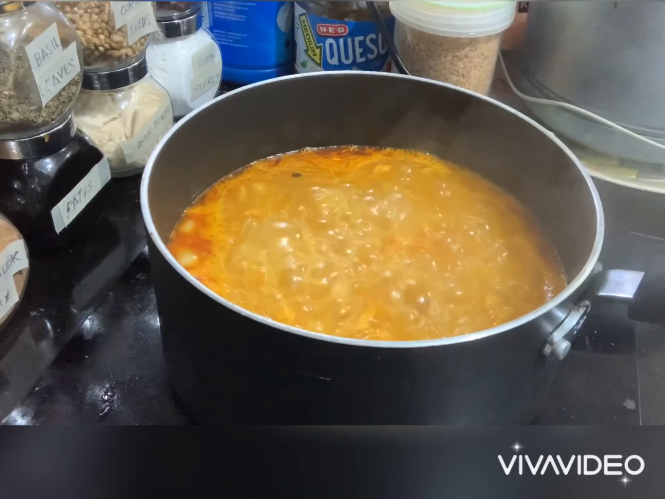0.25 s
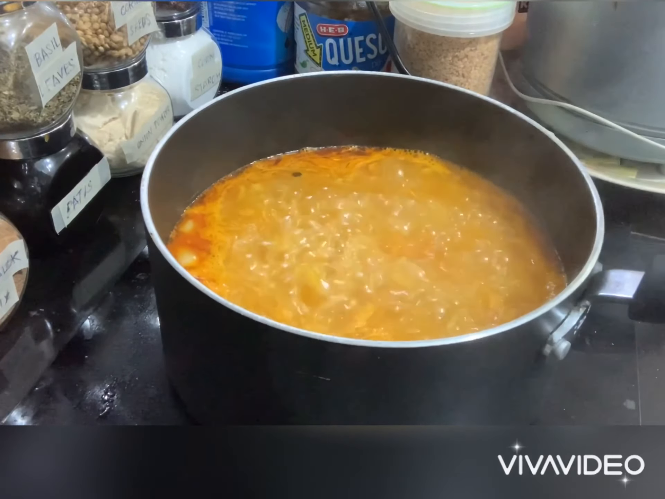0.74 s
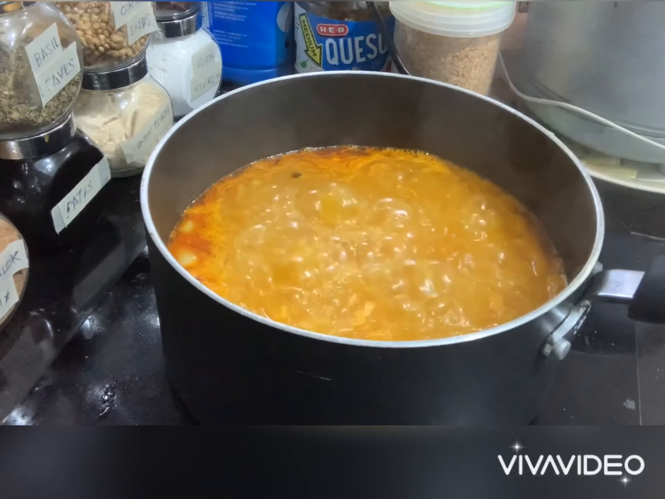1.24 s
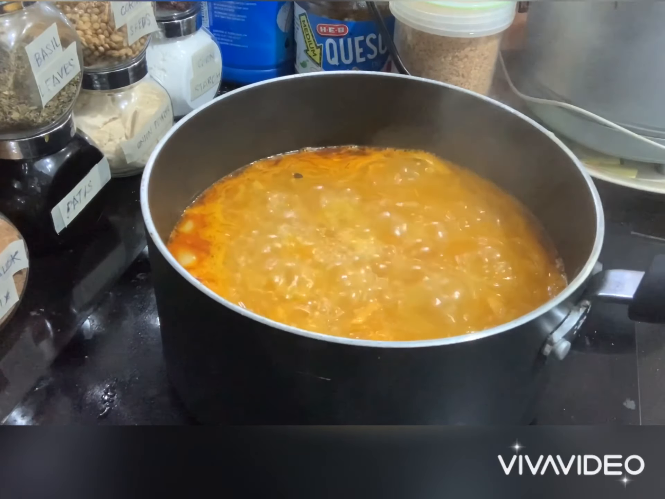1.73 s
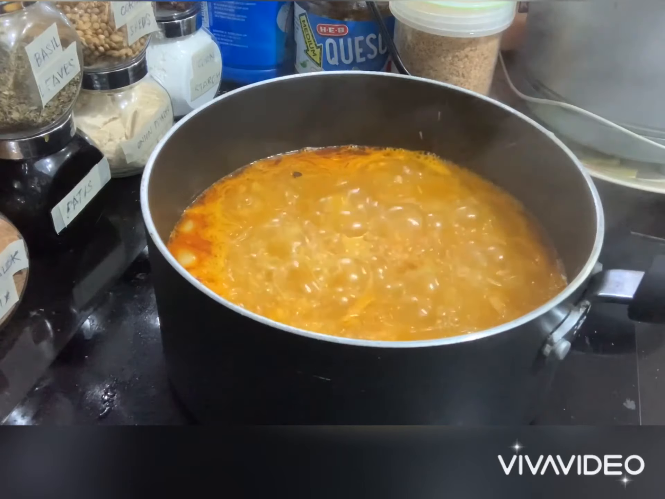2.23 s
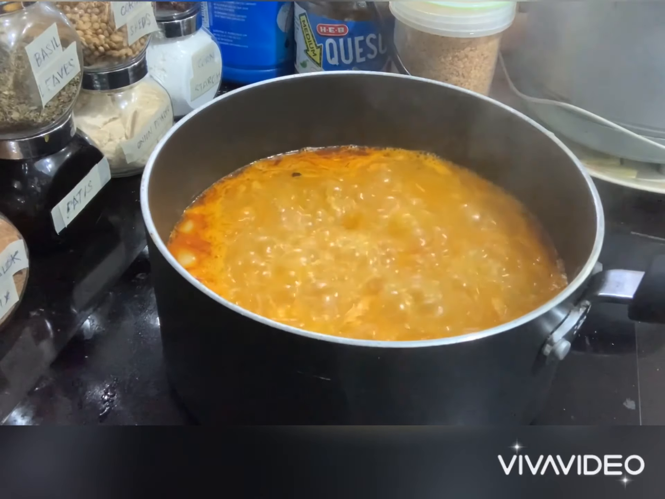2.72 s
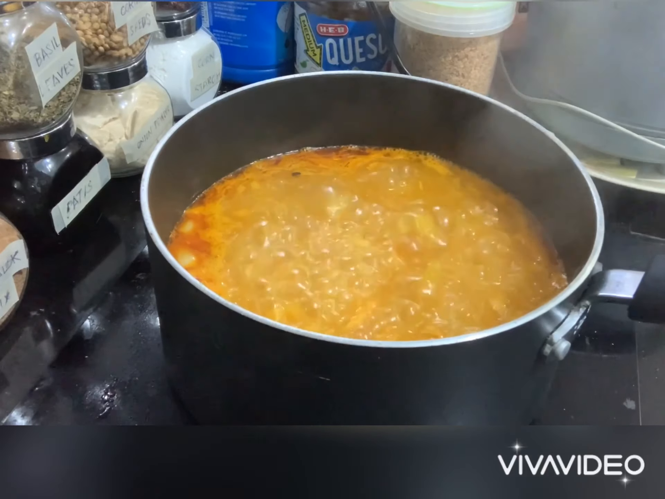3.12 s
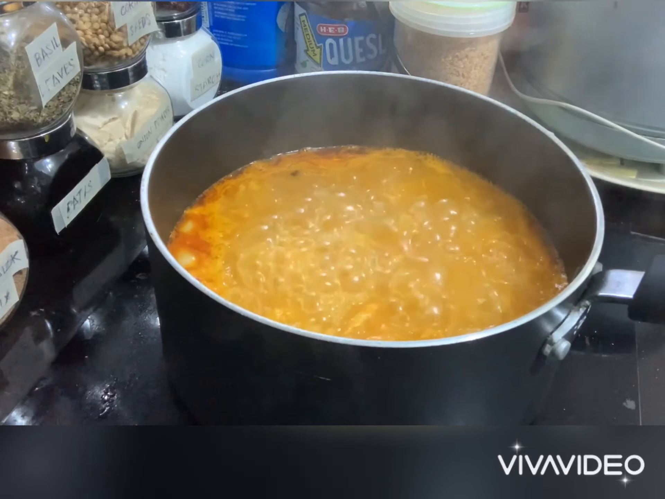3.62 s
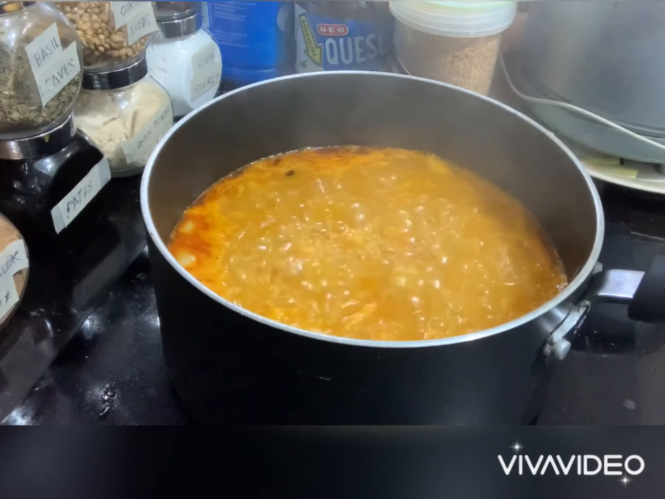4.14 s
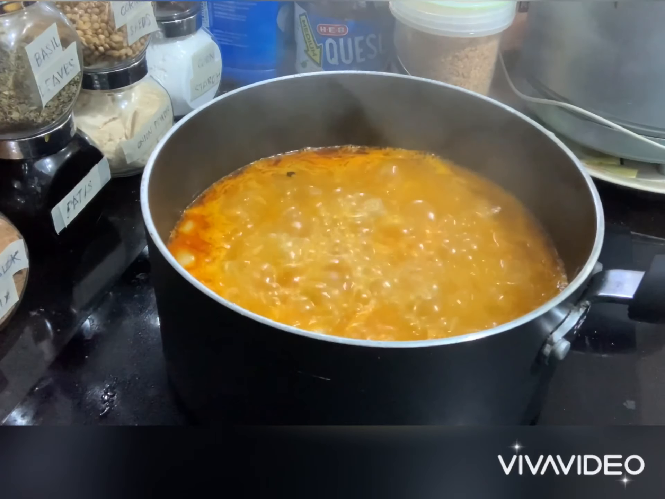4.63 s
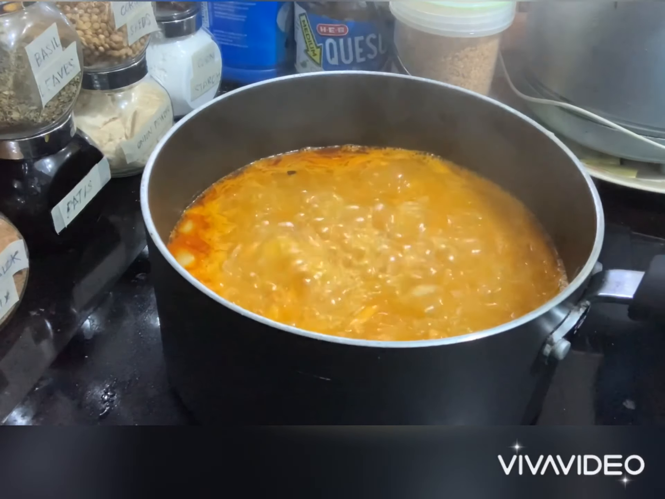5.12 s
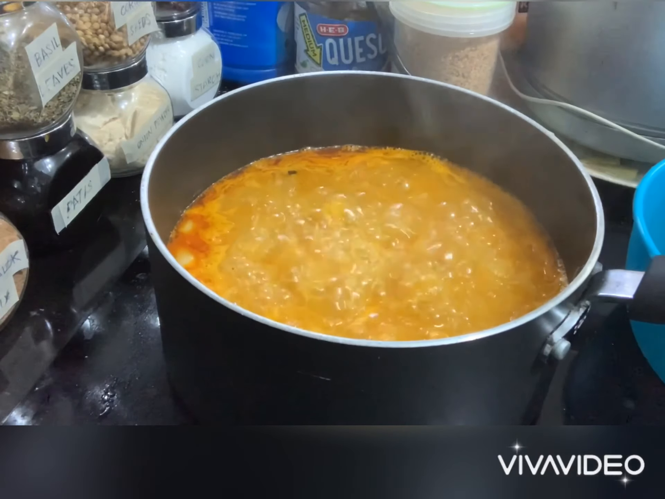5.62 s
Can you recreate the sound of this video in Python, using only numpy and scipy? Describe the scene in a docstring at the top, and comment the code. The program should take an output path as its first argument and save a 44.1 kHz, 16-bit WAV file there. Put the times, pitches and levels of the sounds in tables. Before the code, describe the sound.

A pot of soup at a rolling boil in a small home kitchen, heard in stereo from just above the pan, slightly left. Wet bubbles pop many times a second, each rising slightly in pitch, with occasional bright film snaps. A bright crackling sizzle comes early and dies away. Low steam gulps cluster before two seconds; a strong one spatters after 3.7. Bubbling then continues evenly over soft bassy room noise and hum.

```python
"""A small kitchen: thick soup at a rolling boil in an open saucepan, heard from just above the rim.
Bubbles burst in little clusters and thin films snap; each bubble is a short ringing note that rises in pitch.
Big pockets of steam gulp with low swelling notes and spatter, while small bubbles simmer and the depths rumble.
Random ticks make the fizz and the sizzle at the edge; filtered noise and steady tones make the room and cooker."""
import sys
import numpy as np
from scipy import signal
from scipy.fft import rfft, irfft, next_fast_len
from scipy.io import wavfile

SR = 44100
rng = np.random.default_rng(int(sys.argv[2]) if len(sys.argv) > 2 else 0)


def int16_out(signal):
    """Quantize to a 16-bit WAV file."""
    q = np.round(np.clip(np.atleast_2d(signal).T, -1, 1) * 32767)
    wavfile.write(sys.argv[1], SR, q.astype(np.int16))


N = 258602
TIME = np.arange(N) / SR  # seconds


# the largest bursting bubbles, before POP_DB and the pan and kitchen:
# [start_s, level_db, pitch_hz, foam_db (the small bubbles around it, compared with the burst)]
BURSTING_BUBBLES = [(0.037, -30.5, 1670, -28), (0.104, -29.5, 1380, -6), (0.175, -32.5, 900, -8),
                    (0.212, -27.5, 1230, -10), (0.237, -27.5, 1360, -1), (0.300, -30, 1510, -1),
                    (0.337, -24.5, 1080, -11), (0.429, -35, 1170, 0), (0.480, -15.5, 1310, -18),
                    (0.536, -29, 1580, -11), (0.564, -31.5, 1000, -10), (0.656, -32.5, 850, -6),
                    (0.767, -31, 980, 0), (0.788, -33, 1130, 5.5), (0.844, -23.5, 1170, -4),
                    (0.864, -18.5, 1360, -28), (0.899, -31, 880, -17), (0.932, -29, 1870, -22),
                    (1.037, -33.5, 810, 4.5), (1.046, -23.5, 1460, -19), (1.134, -20.5, 1450, -10),
                    (1.215, -34, 1090, -15), (1.314, -27, 1250, -4), (1.328, -36, 940, 6),
                    (1.345, -28, 1570, 0), (1.435, -23, 990, -7), (1.447, -31, 1410, -11),
                    (1.518, -28.5, 930, 0), (1.629, -22.5, 2000, -6), (1.678, -28, 1390, -7),
                    (1.713, -30, 1080, 4.5), (1.731, -40, 1200, -15), (1.780, -34, 710, -4),
                    (1.834, -31, 920, -2), (1.995, -24.5, 1120, -5.5), (2.040, -28, 1240, -18),
                    (2.095, -31, 1600, -10), (2.124, -34, 840, -4), (2.249, -31, 840, 4.5),
                    (2.312, -27, 1560, -1), (2.324, -26, 860, -5), (2.430, -34, 1000, 8.5),
                    (2.441, -24, 1470, 0.5), (2.451, -43, 875, -12), (2.531, -35.5, 880, 4),
                    (2.547, -22.5, 1700, -18), (2.593, -19.5, 1600, -14), (2.714, -27, 1180, -3),
                    (2.739, -23, 1270, -11), (2.7575, -17.5, 1530, -8.5), (2.915, -28.5, 1290, 1),
                    (2.936, -26, 1180, -3), (3.003, -32.5, 830, -27), (3.122, -22.5, 1230, -13),
                    (3.125, -24.5, 814, -14), (3.206, -27.5, 1230, -2.5), (3.238, -40, 840, -19),
                    (3.364, -31.5, 1050, -6), (3.456, -21, 1470, -24), (3.508, -25.5, 1210, -4),
                    (3.520, -16.5, 1150, -12.5), (3.568, -26.5, 1660, -16), (3.614, -31, 1500, 0),
                    (3.662, -31.5, 1490, -6), (3.711, -31, 664, -26), (3.713, -23.5, 1650, -1.5),
                    (3.819, -31, 870, -12), (3.844, -26, 1470, -9), (3.876, -32, 1010, -13),
                    (3.963, -30.5, 850, -12), (4.043, -34, 1250, -14), (4.117, -26.5, 1770, -6),
                    (4.205, -33, 1230, -5), (4.280, -25, 1300, -5), (4.348, -35, 1340, -5),
                    (4.510, -19.5, 1200, -7.5), (4.531, -25, 1100, -23), (4.593, -32, 870, -9),
                    (4.652, -35, 1290, 9), (4.765, -25, 1350, -23), (4.810, -28, 1400, -1),
                    (4.883, -24, 1330, -12), (4.932, -28.5, 1540, -5), (4.973, -29, 920, -6.5),
                    (5.15, -25, 1280, 0.5), (5.177, -29, 1590, 0), (5.229, -35, 1440, -3),
                    (5.299, -31, 1510, -9), (5.332, -28.5, 920, -6), (5.357, -30, 1140, -7),
                    (5.436, -32.5, 1110, 2), (5.532, -25.5, 1240, -2), (5.665, -32, 1120, -10),
                    (5.7, -26, 1090, -8), (5.848, -27.5, 1310, -27)]
POP_DB = 1.8
POP_CYCLES = 1.95  # wave cycles in which a large bubble fades to about a third


def bursts(foam_s, foam_lead_s, foam_octaves, foam_cycles, rise, count):
    """Large surface bubbles burst, each among a few smaller ones that give way one after another."""
    start_s, level_db, pitch_hz, foam_db = np.transpose(BURSTING_BUBBLES)
    main = bubbles(start_s, from_db(level_db), pitch_hz, POP_CYCLES, rise, size=1400)
    draws = rng.standard_normal((len(start_s), 4, count))
    when, strength, pitch, ring = draws.transpose(1, 0, 2)
    # most of the foam follows the burst, ever weaker
    turn = (np.arange(count) + 0.5 + 0.3 * when) / count
    foam_starts = start_s[:, None] - foam_lead_s + foam_s * turn
    foam_gains = from_db((level_db + foam_db)[:, None] - 4.5 + 2 * strength - 4 * turn)
    # foam pitches scatter around a point midway between the burst and 1300 Hz
    foam_hz = np.sqrt(pitch_hz[:, None] * 1300) * 2 ** (foam_octaves * pitch)
    cycles = foam_cycles * 2 ** (0.3 * ring)
    foam = bubbles(foam_starts.ravel(), foam_gains.ravel(), foam_hz.ravel(), cycles.ravel(), rise, size=1000)
    return main + foam


def bubbles(starts, gains, pitches, cycles, rise, size):
    """Each bubble opens within a cycle, rings down over a few more and rises in pitch."""
    age = np.arange(size) / SR
    turns = pitches[:, None] * age
    life = turns / np.reshape(cycles, (-1, 1))
    phase = 2 * np.pi * turns * (1 + rise * life / (1 + life))
    opening = 1 - np.exp(-1.5 * turns ** 2)
    rings = gains[:, None] * opening * np.exp(-life) * np.sin(phase)
    at = (np.maximum(starts, 0) * SR).astype(int)[:, None] + np.arange(size)
    # add every ring into one track
    return np.bincount(at.ravel(), rings.ravel(), N)[:N]


# thin films snapping, before SNAP_DB and the pan and kitchen: [start_s, level_db, pitch_hz]
FILM_SNAPS = [(0.221, -31, 3430), (0.682, -35, 2290), (1.194, -33, 2680), (1.2421, -27.5, 2870),
              (2.0944, -28.5, 3070), (3.1715, -29, 2460), (3.616, -24.5, 2900), (3.711, -24, 3260),
              (4.118, -38, 2250), (5.001, -34, 2470), (5.219, -30.5, 3070)]
SNAP_DB = 2.5
# the tick of a tearing film: [pitch_hz, width_hz, level_db (click before filtering, compared with the snap)]
TEARING_TICK = (3000, 3000, 19)


def snaps(spray_s, octaves, spray_db, count):
    """A film tears with a bright tick and a quick spray of still smaller bubbles."""
    start_s, level_db, pitch_hz = np.transpose(FILM_SNAPS)
    shape = (len(start_s), count)
    spray_starts = start_s[:, None] + spray_s * rng.exponential(1, shape)
    spray_hz = pitch_hz[:, None] * 2 ** (octaves * rng.standard_normal(shape))
    spray_gains = np.repeat(from_db(level_db + spray_db), count)
    spray = bubbles(spray_starts.ravel(), spray_gains, spray_hz.ravel(), 2.6, 0.076, size=400)
    tick_hz, tick_width, tick_db = TEARING_TICK
    tears = np.bincount((start_s * SR).astype(int), from_db(level_db + tick_db), N)
    tick = resonate(resonate(tears, tick_hz, tick_width), tick_hz, tick_width)
    snap = bubbles(start_s, from_db(level_db), pitch_hz, 1.3, 0.03, size=400)
    return tick + snap + spray


# big steam pockets, before the pan and kitchen: [start_s, level_db, pitch_hz, swell_s, spatter_db]
STEAM_POCKETS = [(1.112, -34, 122, 0.012, -62), (1.322, -31, 157, 0.018, -48), (1.688, -35, 375, .011, -55),
                 (1.692, -27, 161, .017, -41), (1.718, -28, 270, 0.014, -54),
                 (1.757, -24.5, 262, 0.011, -45), (1.770, -31, 358, .012, -58),
                 (1.774, -30, 160, 0.017, -58), (1.825, -36, 260, 0.016, -58),
                 (3.706, -14, 254, 0.0088, -31), (3.733, -33, 280, .011, -45),
                 (3.756, -23.5, 268, 0.0125, -40), (3.795, -37, 268, .022, -60)]
# tone colour of the spatter: [pitch_hz, level_db]
SPATTER_COLOUR = [(200, -31), (400, -1.5), (700, 10.5), (1000, 2), (2100, 8), (3200, -0.5), (5500, -4.5),
                  (9000, -13), (15000, -16.5)]


def gulps(rise, spray_lead_s, spray_stretch, slosh_db, slosh_s, count):
    """A pocket of steam swells through the surface with a low note, sloshes shut and throws a spray of drops."""
    note, spray = np.zeros(N), np.zeros(N)
    age = TIME[:SR // 3]
    for start_s, level_db, pitch_hz, swell_s, spatter_db in STEAM_POCKETS:
        life = age / swell_s
        phase = 2 * np.pi * pitch_hz * age * (1 + rise * life)
        swell = life ** 1.5 * np.exp(-life ** 2 / 3)
        note[int(start_s * SR):][:len(age)] += from_db(level_db) * swell * np.sin(phase)
        # slower pockets stir up more soup
        when, pitch = rng.random((2, count))
        stirred = np.full(count, from_db(slosh_db) * swell_s / slosh_s)
        note += bubbles(start_s + 3 * swell_s * when, stirred, 200 * 3.8 ** pitch, 3.4, 0.11, size=3000)
        flight = age / (spray_stretch * swell_s)
        spray_start = int((start_s - spray_lead_s) * SR)
        spray[spray_start:][:len(age)] += from_db(spatter_db) * flight * np.exp(1 - flight)
    return note, spray * crackle(2500, 2.6, SPATTER_COLOUR)


# strength of small bubbles by pitch: [pitch_hz, level_db]
SMALL_BUBBLE_STRENGTH = [(330, -5.5), (500, -4.5), (800, -1), (1050, -3.5), (1450, 0), (1900, -2),
                         (2800, 2), (4200, -20)]
SURFACE_DB = -50.5  # middle level of the small surface bubbles, before the pan


def simmer(size_db, cycles, count):
    """The whole surface is covered in small bubbles of every pitch from 330 to 4200 Hz."""
    when, size, pitch = rng.random((count, 3)).T
    hz = 330 * (4200 / 330) ** pitch
    # many weak bubbles, a few strong
    gains = from_db(at_hz(SMALL_BUBBLE_STRENGTH, hz) - size_db * np.log(size + 0.058))
    return rms_one(bubbles(when * N / SR, gains, hz, cycles, 0.078, size=800))


# level at the start, before the pan, then a slow easing off
RUMBLE_DB, RUMBLE_EASE_DB_PER_S = -43.5, 3


def rumble(low_hz, high_hz, size_db, cycles, count):
    """Steam bubbles wobble up from the bottom of the pan with low notes."""
    when, size, pitch = rng.random((count, 3)).T
    hz = low_hz * (high_hz / low_hz) ** pitch
    gains = from_db(-size_db * np.log(size + 0.23))
    return rms_one(bubbles(when * N / SR, gains, hz, cycles, 0.09, size=4000))


# tone colour of the fizz: [pitch_hz, level_db]
FIZZ_COLOUR = [(400, -2.5), (1000, 3), (2200, 7), (3400, 6), (5000, 1), (7000, -3), (12000, -64)]
# level at the start, then a slow easing off
FIZZ_DB, FIZZ_EASE_DB_PER_S = -49, 0.5


def fizz():
    """Fine random ticks flare up and fade over a steady share."""
    level = from_db(FIZZ_DB - FIZZ_EASE_DB_PER_S * TIME)
    flares = spurts(per_s=90, fade_s=0.006, steady=3.2, wander_db=1.0)
    return level * flares * crackle(4500, 2.5, FIZZ_COLOUR)


# sizzle on the hot wall, dying down on the way, before SIZZLE_DB: [time_s, level_db]
SIZZLE_LEVEL = [(0.0, -55), (0.08, -50), (0.18, -59), (0.25, -54), (0.36, -58), (0.62, -54), (0.77, -55.5),
                (0.85, -55), (1.0, -55.5), (1.08, -51), (1.22, -56.5), (1.32, -54), (1.38, -52.5),
                (1.45, -56.5), (1.92, -54.5), (2.1, -64), (2.23, -55), (2.35, -58.5), (2.41, -53.5),
                (2.56, -57), (2.68, -67), (2.8, -61), (2.94, -66), (3.59, -70), (3.88, -62.5),
                (4.19, -68.5), (5.12, -67), (5.86, -65)]
SIZZLE_DB = 7
# tone colour of the sizzle: [pitch_hz, level_db]
HOT_WALL_COLOUR = [(1500, -14), (4000, -2), (7000, -1), (8500, 0), (10600, -.5), (11400, -3.5),
                   (12000, -1.5), (13200, -6), (14300, -4.5), (15500, -6.5)]


def sizzle():
    """Drops boil off the hot wall at the edge in a bright, flaring crackle."""
    level = from_db(SIZZLE_DB) * gain_in_time(SIZZLE_LEVEL)
    flares = spurts(per_s=55, fade_s=0.010, steady=0.8, wander_db=0.5)
    return level * flares * crackle(6000, 0.76, HOT_WALL_COLOUR)


def spurts(per_s, fade_s, steady, wander_db):
    """Drops land on hot metal: each flares at once and boils off, over a steady share; rms 1."""
    landings = (rng.random(N) < per_s / SR) * np.minimum(rng.exponential(1, N), 3)
    flare = signal.lfilter([1], [1, -np.exp(-1 / (fade_s * SR))], landings + 1e-18)
    power = steady + flare / flare.mean()
    return rms_one(np.sqrt(power) * from_db(wander_db * drift(16)))


def crackle(per_s, size_db, colour):
    """Tiny random ticks, most of them weak, a few strong; rms 1."""
    sizes = from_db(size_db * np.minimum(rng.exponential(1, (2, N)), 5))
    signs = rng.choice([-1, 1], (2, N))
    happens = rng.random((2, N)) < per_s / SR
    return spread(sizes * signs * happens, colour)


# ringing of the air in the pan above the soup, before ring_db: [pitch_hz, width_hz, level_db]
PAN_RINGING = [(401, 16, 1), (577, 17, 2.5), (781, 61, 11), (873, 11.7, 13.5), (1257, 96, -4.5),
               (1473, 112, 7), (1865, 26, 5), (2094, 46, 11.5), (3360, 26, 10)]


def pan_air(pair, ring_db):
    """The air in the pan rings along with a stereo sound."""
    ringing = sum(from_db(db) * resonate(pair, hz, width) for hz, width, db in PAN_RINGING)
    return pair + from_db(ring_db) * ringing


KITCHEN_T60_S = 0.23  # time in which the kitchen's decay drops by 60 dB
EAR_LAG_S = 0.000085  # delay of the direct sound on the right


def pan_and_kitchen(x, ring_db, wall_s, wall_db, room_db):
    """Direct sound reaches the left first; the pan's air rings, its wall scatters and the kitchen answers."""
    direct = np.array([x, np.interp(TIME - EAR_LAG_S, TIME, x)])
    age = TIME[:SR // 2]
    wall_shape = (1 - np.exp(-age / 0.0072)) * np.exp(-age / wall_s)
    scatter = rms_one(spread(rng.standard_normal((2, len(age)))) * wall_shape)
    room_shape = (1 - np.exp(-age / 0.011)) * from_db(-60 * age / KITCHEN_T60_S)
    tail = rms_one(spread(rng.standard_normal((2, len(age)))) * room_shape)
    echo = (from_db(wall_db) * scatter + from_db(room_db) * tail) / np.sqrt(len(age))
    wet = signal.fftconvolve(x[None], echo, axes=1)[:, :N]
    return pan_air(direct + wet, ring_db)


# cooker hum, before the growth: [pitch_hz, width_hz, level_db]; each width is doubled for two filters in a row
COOKER_HUM = [(72.2, 4.1, -42.5), (118, 8.5, -51.5), (264.7, 24.6, -52.5)]
# the hum grows half way: [time_s, level_db]
HUM_GROWTH = [(2.7, -4.5), (3.3, -0.5)]
# whine with mains sidebands: [pitch_hz, level_db]
COOKER_WHINE = [(7573, -61), (7693, -58.5), (7813, -73)]


def cooker():
    """A wavering low hum, and a thin high whine that reaches the two sides in nearly opposite phase."""
    hum = np.zeros(N)
    for hz, width, db in COOKER_HUM:
        narrow = resonate(resonate(rng.standard_normal(N), hz, 2 * width), hz, 2 * width)
        hum += from_db(db) * rms_one(narrow)
    ears = np.array([[0], [2.8]])  # phase in radians, left and right
    whine = np.zeros((2, N))
    for hz, db in COOKER_WHINE:
        phase = 2 * np.pi * hz * TIME + 0.1 * drift(12) + ears
        whine += from_db(db) * np.sqrt(2) * np.sin(phase)
    return gain_in_time(HUM_GROWTH) * hum + whine


# tone colour of the room noise: [pitch_hz, level_db]
ROOM_COLOUR = [(15, -48), (28, -38), (40, -1.5), (60, 1), (95, -0.5), (140, -6), (200, -9), (300, -7),
               (480, -19), (850, -14.5), (1800, -18), (4000, -24.5), (9000, -47), (16000, -47)]


def room_noise():
    """Soft noise, strongest in the bass, fills the kitchen."""
    return from_db(-42.5) * spread(rng.standard_normal((2, N)), ROOM_COLOUR)


# likeness of left and right in diffuse sound, held within 0.98 either way:
# [pitch_hz, correlation (1 same, 0 unrelated, -1 opposite)]
LEFT_RIGHT_LIKENESS = [(40, .8), (150, .75), (300, .4), (600, 0), (1400, .25), (2300, -.15), (3700, .2),
                       (5200, -.2), (6500, 0), (7300, -.45), (8000, -.95), (9200, -.93), (10200, -.1),
                       (11600, .9), (13500, .9), (15200, -.7)]


def spread(pair, colour=None):
    """Two unrelated signals become one diffuse stereo sound of a given colour; rms 1."""
    size = next_fast_len(pair.shape[1])
    hz = np.arange(size // 2 + 1) * SR / size
    alike = np.clip(at_hz(LEFT_RIGHT_LIKENESS, hz), -0.98, 0.98)
    tint = from_db(at_hz(colour, hz)) if colour else 1
    mid, side = rfft(pair, size) * tint
    mid, side = mid * np.sqrt(1 + alike), side * np.sqrt(1 - alike)
    return rms_one(irfft(np.array([mid + side, mid - side]), size)[:, :pair.shape[1]])


def resonate(x, hz, width):
    """A resonance lets through a band of the given width, with about unit gain on top."""
    r = np.exp(-np.pi * width / SR)
    top = np.array([1, 0, -1]) * (1 - r * r) / 2
    feedback = [1, -2 * r * np.cos(2 * np.pi * hz / SR), r * r]
    return signal.lfilter(top, feedback, x + 1e-18)


def drift(per_s):
    """A random wander of rms 1, with straight lines between per_s random points a second."""
    knots = rng.standard_normal(int(per_s * N / SR) + 2)
    return rms_one(np.interp(TIME * per_s, np.arange(len(knots)), knots))


def from_db(db):
    """Decibels to gain."""
    return 10 ** (np.asarray(db) / 20)


def rms_one(x):
    """Scale to unit power."""
    return x / np.sqrt(np.mean(x ** 2) + 1e-20)


def gain_in_time(rows):
    """A curve of times and decibels as a gain per sample."""
    time_s, level_db = np.transpose(rows)
    return from_db(np.interp(TIME, time_s, level_db))


def at_hz(points, hz):
    """Read a table on a log-frequency axis."""
    table_hz, values = np.transpose(points)
    return np.interp(np.log(hz + 1e-3), np.log(table_hz), values)


def scene():
    """The pan sits a little to the left; the gulps come from its far side and reach the right later."""
    note, spatter = gulps(rise=0.03, spray_lead_s=0.005, spray_stretch=1.6, slosh_db=-42.5,
                          slosh_s=0.0095, count=9)
    pops = from_db(POP_DB) * bursts(foam_s=0.024, foam_lead_s=0.008, foam_octaves=0.35, foam_cycles=2.7,
                                    rise=0.06, count=6)
    pops += from_db(SNAP_DB) * snaps(spray_s=0.003, octaves=0.38, spray_db=-9.5, count=12)
    pops = pan_and_kitchen(pops, ring_db=-6, wall_s=0.005, wall_db=-10.5, room_db=-15)

    # the small bubbles come in waves, from all over the pan
    surface = spread(np.array([simmer(size_db=3.2, cycles=4, count=2200) for side in range(2)]))
    deep = spread(np.array([rumble(low_hz=91.6, high_hz=320, size_db=6.5, cycles=1.84, count=500)
                            for side in range(2)]))
    waves = from_db(SURFACE_DB + 1.43 * drift(21.99))
    depth = from_db(RUMBLE_DB - RUMBLE_EASE_DB_PER_S * TIME)
    soup = pan_air(waves * surface + depth * deep, ring_db=-3.0)

    gulp = pan_and_kitchen(note, ring_db=-4, wall_s=0.0047, wall_db=-20, room_db=-16)
    gulp = np.array([gulp[0], np.interp(TIME - 0.0006, TIME, gulp[1])])

    froth = fizz()
    edge = sizzle()
    background = room_noise() + cooker()
    # left and right levels
    pan = (pops + soup + gulp) * from_db([[1.0], [-1.1]])
    return pan + spatter + froth + edge + background * from_db([[0.7], [-0.7]])


CUTOFF_HZ = 15700


def record(dry):
    """The top is cut steeply."""
    low_pass = signal.ellip(10, 0.2, 80, CUTOFF_HZ, fs=SR, output="sos")
    return signal.sosfilt(low_pass, dry)


dry = scene()
out = record(dry)
int16_out(out)
```